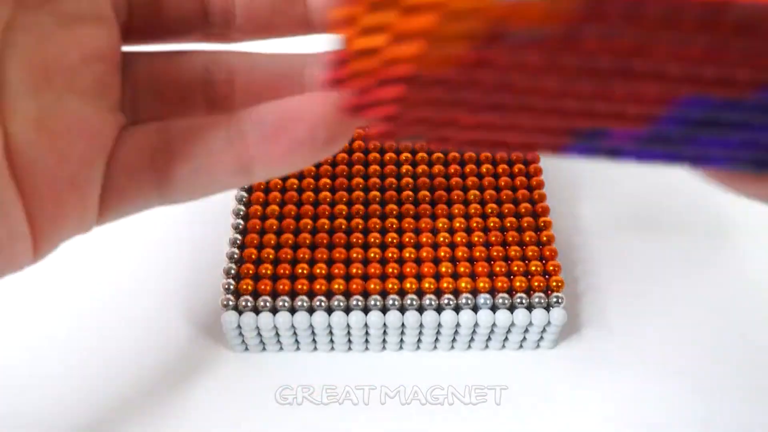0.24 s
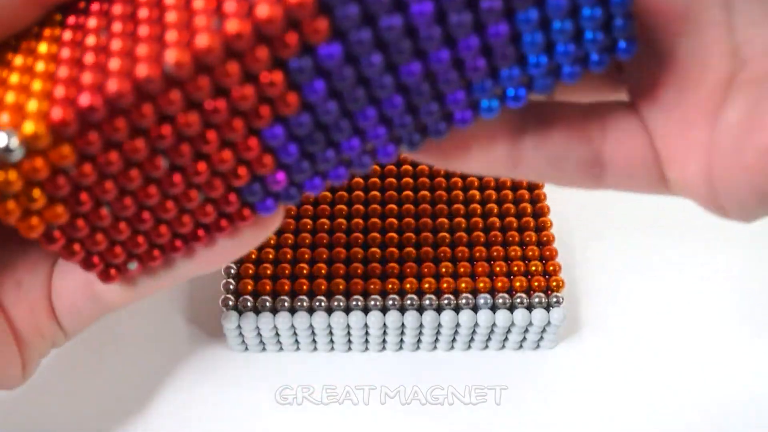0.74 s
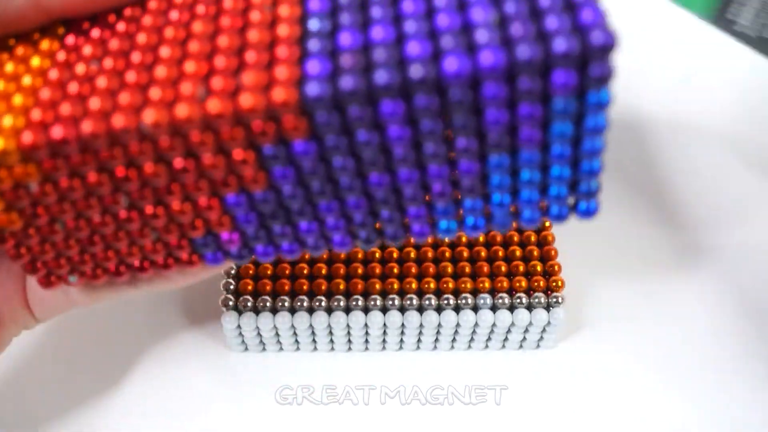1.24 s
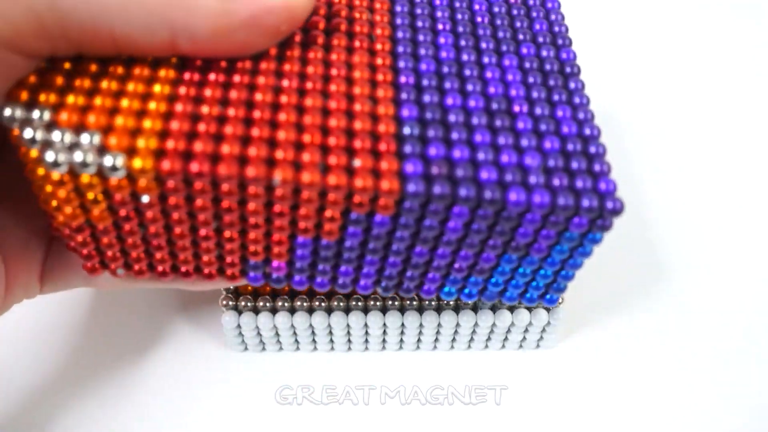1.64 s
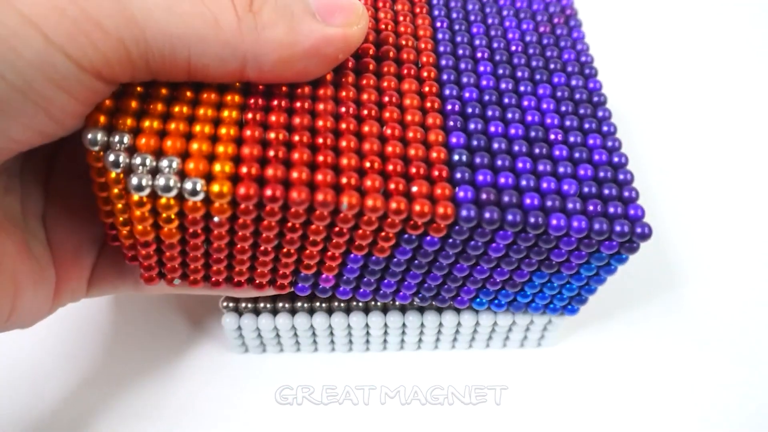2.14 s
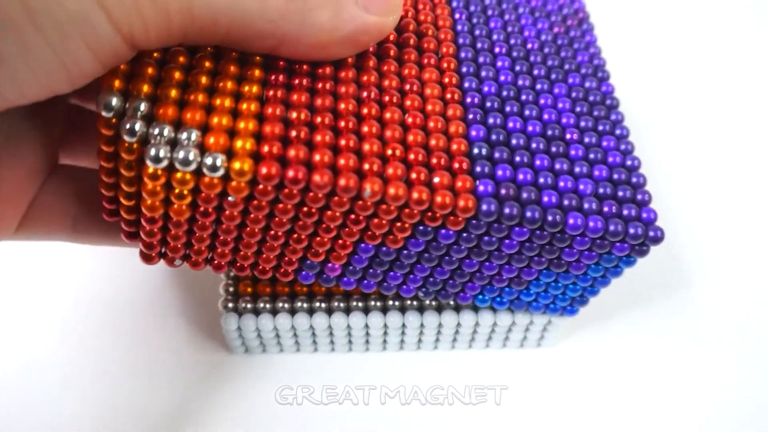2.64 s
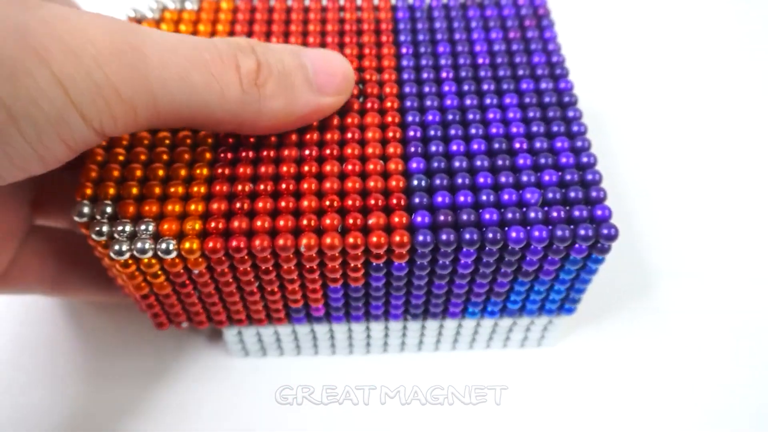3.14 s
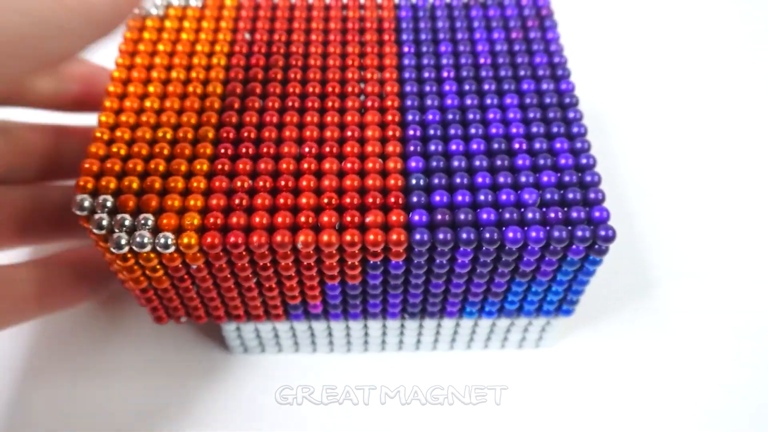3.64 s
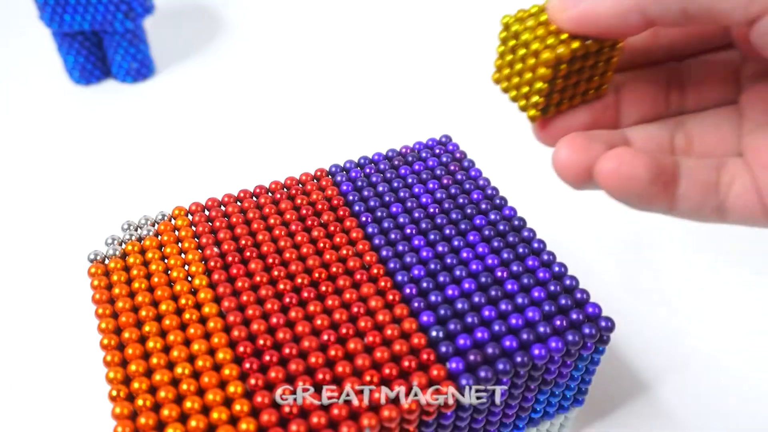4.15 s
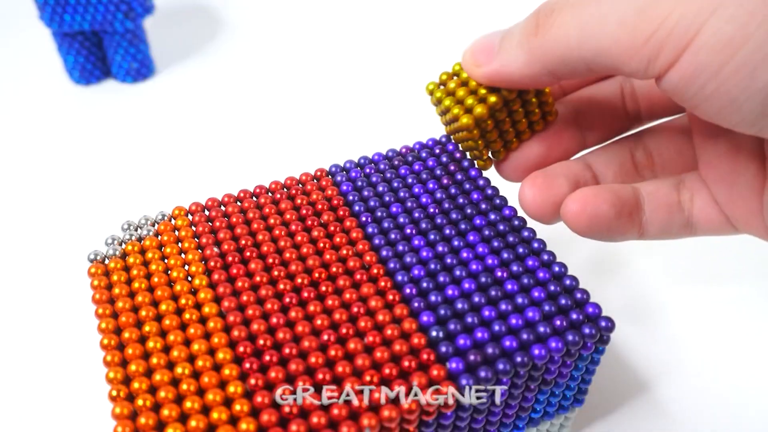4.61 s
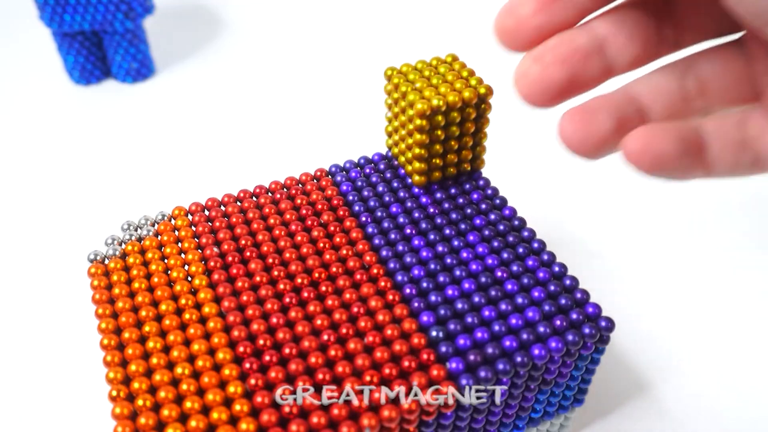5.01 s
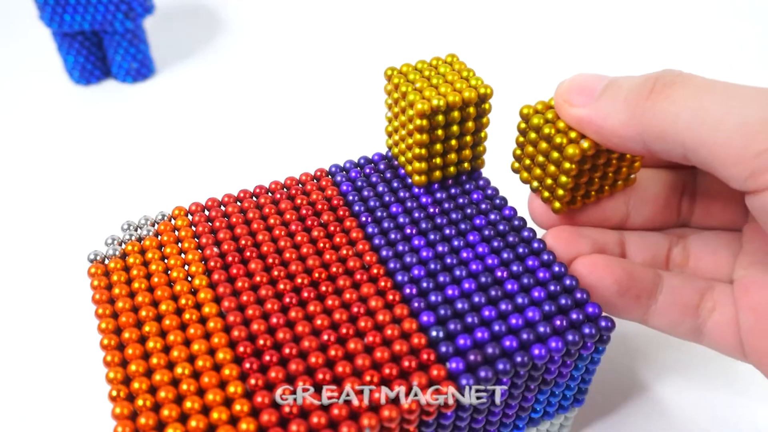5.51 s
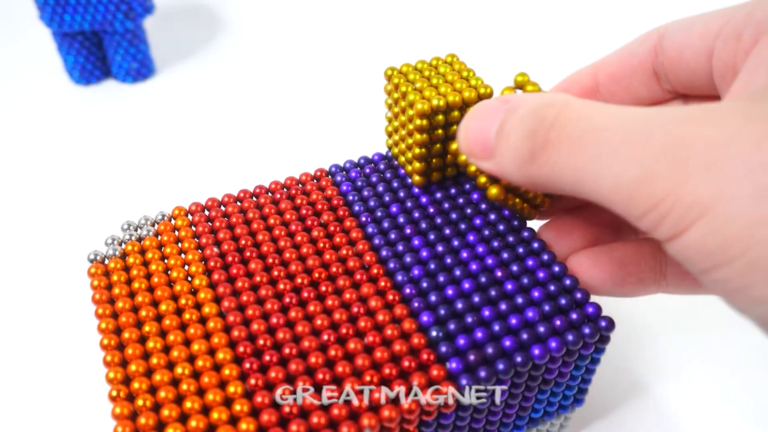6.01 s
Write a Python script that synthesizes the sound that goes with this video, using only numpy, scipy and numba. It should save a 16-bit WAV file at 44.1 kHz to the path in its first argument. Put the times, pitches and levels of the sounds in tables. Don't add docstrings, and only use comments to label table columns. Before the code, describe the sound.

Close metallic bead rattles and bright clicks give way to three heavy, woody table thumps and lighter cube snaps over soft hiss.

```python
import sys
import numpy as np
from scipy import signal
from scipy.fft import rfft, irfft
from scipy.io import wavfile
from numba import njit

SR = 44100
rng = np.random.default_rng(int(sys.argv[2]) if len(sys.argv) > 2 else 0)


def how_loud(loudness_db):
    steps = np.asarray(loudness_db, float) / 20
    return 10 ** steps


def wav_out(sig):
    wavfile.write(sys.argv[1], SR, np.round(np.clip(np.atleast_2d(sig).T, -1, 1) * 32767).astype(np.int16))


N = 276504
T = np.arange(N) / SR

# start in seconds, peak in dB, contact in ms, place struck (rounded to an index).
BLOWS = [(1.26, -25, 0.63, 1.5), (1.279, -31, 2.5, -0.5), (1.601, -28, 1.6, 2), (2.1148, -10, 1.4, 0),
         (2.116, -29, 4, 3), (2.158, -20.5, 2, 0), (2.192, -34.5, 13, 2.5), (2.74, -42, 2.5, 1),
         (2.799, -35, 2.5, 1), (2.98, -39.5, 2.1, 1), (3.156, -37, 2.6, 1.5), (3.19, -26, 0.98, 2),
         (3.2153, -6.5, 0.58, 1), (3.258, -24, 2.2, 1.5), (3.712, -35, 0.83, 4), (4.598, -28, 0.59, 4),
         (5.0088, -5, 1.4, 2.5), (5.05, -19, 1.9, 2.5), (5.101, -38, 7.6, 3.5), (5.85, -27.5, 0.76, 4)]
EDGES_HZ = (520, 2600, 6500, 10500, 16200)
RATTLE_COLOUR_DB, SKIN_COLOUR_DB = (-2, -9.5, -19), (0, -3, -1)


def unit(x):
    return x / np.sqrt(np.mean(x ** 2))


def band(x, lo_hz, hi_hz):
    return signal.sosfilt(signal.butter(2, (lo_hz, hi_hz), "band", fs=SR, output="sos"), x)


def spread(x, pan_db):
    return x * how_loud(np.array([pan_db, -pan_db]) / 2)


def floor():
    # frequency in Hz, hiss density in dB per Hz.
    hiss_curve = [(12, -53), (20, -34), (48, -10.5), (71, -2), (86, -17.5), (124, -3), (143, -10),
                  (492, -16), (535, -16), (863, -19.5), (10500, -31.5), (14700, -33), (16500, -48)]
    # frequency in Hz, likeness of left and right, where 1 is the same and 0 or less is unrelated.
    likeness = [(60, 0.97), (130, 0.85), (290, 0.36), (640, -0.16), (1410, -0.35), (3100, 0), (6820, 0.15),
                (15000, 0.33)]
    # time in seconds, hum level in dB.
    hum_course = [(0.0, -68), (0.2, -56), (2.0, -58), (3.5, -57), (4.0, -57), (4.3, -66), (4.7, -55),
                  (5.5, -62.5), (6.27, -58)]
    hiss_db, rumble_db, hum_hz = -51.5, -62.5, 120
    shake_db, shake_t60_s = -32.5, 0.52

    log_hz = np.log(np.maximum(np.arange(N // 2 + 1) * SR / N, 1))

    def read(curve):
        hz, value = np.transpose(curve)
        return np.interp(log_hz, np.log(hz), value)

    like = np.clip(read(likeness), 0, 1)
    mid, side = (rfft(rng.standard_normal(N)) * how_loud(read(hiss_curve)) for _ in range(2))
    pair = mid * np.sqrt(1 + like) + side * np.sqrt(1 - like) * np.array([[1], [-1]])
    hiss = unit(irfft(pair, N)) * how_loud(hiss_db)

    hum = how_loud(np.interp(T, *np.transpose(hum_course))) * np.sqrt(2) * np.sin(2 * np.pi * hum_hz * T)

    start, peak_db = np.array(BLOWS).T[:2, :, None]
    since = T[::64] - start
    shakes = how_loud(peak_db + shake_db - 60 * np.abs(since) / shake_t60_s) * (since > 0)
    shake = shakes.sum(0).repeat(64)[:N]
    rumble = (how_loud(rumble_db) + shake) * unit(band(rng.standard_normal(N), 44.3, 88.7))
    return hiss + hum + rumble


def hands(t):
    # time in seconds, left minus right in dB, hollow between block and palm in Hz.
    places = [(0.0, 5, 1460), (0.39, -1, 1710), (0.58, 1, 1970), (0.86, -0.5, 2270), (0.94, -0.2, 1540),
              (1.11, -1, 1270), (1.18, -1.5, 1610), (1.24, -2, 820), (1.3, -3, 1270), (1.6, -3.5, 1850),
              (2.12, -2, 1250), (2.5, 4, 2000), (3.2, 0.8, 1400), (3.72, 3, 1800), (3.97, -6, 1930),
              (4.6, -1.5, 1810), (5.01, 2, 1000), (5.85, -1.5, 1530)]
    s, pan_db, gap_hz = np.transpose(places)
    return np.interp(t, s, pan_db), np.interp(t, s, gap_hz)


@njit
def hollow(x, hz, width):
    y, b, l = np.empty(len(x)), 0., 0.
    for i in range(len(x)):
        g, k = np.tan(np.pi * hz[i] / SR), width
        v = (b + g * (x[i] - l)) / (1 + g * (g + k))
        b, l, y[i] = 2 * v - b, l + 2 * g * v, k * v
    return y


def ranges(draw, ringing, gap_hz):
    # centre in Hz, width in Hz, level in dB.
    resonances = [(834, 285, 2.5), (1325, 250, 4.5), (2000, 420, 4), (2640, 460, 1.5), (3400, 500, 1),
                  (4187, 310, 2.5), (5680, 1360, 7)]
    rung = sum(how_loud(db) * unit(band(draw(), hz - w / 2, hz + w / 2)) for hz, w, db in resonances)
    low = ringing * unit(rung) + (1 - ringing) * unit(band(draw(), 480, 8100))

    def gap(hz):
        return unit(hollow(hollow(draw(), hz, .4), hz, .4))

    body = low + (.25 + .8 * ringing) * gap(gap_hz)
    ring = low + .7 * ringing * gap(2.3 * gap_hz)
    sources = (body, ring, draw(), draw())
    signs = (1, -1, 1, 1)
    return [sign * unit(band(x, lo, hi)) for sign, x, lo, hi in zip(signs, sources, EDGES_HZ, EDGES_HZ[1:])]


def strokes(rows, colour_db, roundness):
    lift_share = (0, 0.74, 1.16, 1.36)
    treble_fall = (1, 0.86, 0.84, 0.73)
    s, db, rise, fall, bright_db = np.array(rows).T[:, :, None]
    t = T[::32]
    gains = []
    for lift_db, share, sooner in zip((0, *colour_db), lift_share, treble_fall):
        before = (s - t) / np.maximum(rise, .002)
        after = (t - s) / np.maximum(fall * sooner, .002)
        away = np.where(t < s, before, after)
        level = how_loud(db + lift_db + share * bright_db - 20 * away ** roundness)
        gains.append(np.interp(T, t, np.sqrt(np.sum(level ** 2, 0))))
    return gains


def contacts(gains, until_s, per_s, ringing, scatter_db, width):
    n = min(int(until_s * SR), N)
    gains = [g[:n] for g in gains]
    pan_db, gap_hz = hands(T[:n])
    train = (rng.random(n) < per_s / SR) * rng.uniform(-1.22, 1, n)
    train = train * how_loud(scatter_db * np.minimum(rng.exponential(size=n), 3))
    parts = ranges(lambda: np.roll(train, rng.integers(n)), ringing, gap_hz)
    mid = sum(g * p for g, p in zip(gains, parts))
    side = sum(g * share * np.roll(p, n // 3) for g, share, p in zip(gains[1:], (.7, 1, 1.1), parts[1:]))
    pair = mid + width * side * np.array([[1], [-1]])
    return np.pad(spread(pair, pan_db), ((0, 0), (0, N - n)))


def rattles():
    # peak in seconds, body in dB, rise in s and fall in s (both over 20 dB), brightness in dB.
    shears = [(0.018, -50, .012, 0.048, -5), (0.408, -40, 0.011, .035, 12), (0.48, -58.5, 0.071, .12, 7),
              (0.56, -49.5, 0.054, 0.035, 6.5), (0.592, -29, 0.022, 0.092, 0),
              (0.664, -21, 0.034, 0.039, -0.5), (0.72, -46.5, .03, 0.069, -2),
              (0.790, -31, 0.035, 0.046, 0), (0.862, -25.5, 0.054, 0.053, 2), (0.946, -18, 0.036, 0.041, 6),
              (0.968, -20, 0.037, 0.031, -7), (1.0, -48, .02, 0.091, 1), (1.118, -31, .012, 0.06, -13),
              (1.154, -14.5, 0.032, 0.054, 3.5), (1.195, -21, 0.024, 0.032, 4),
              (1.235, -24.5, 0.032, 0.057, -7), (1.275, -29.5, .05, 0.035, 4), (1.31, -50, .02, .08, 9)]
    gains = strokes(shears, RATTLE_COLOUR_DB, roundness=1.29)
    return contacts(gains, until_s=1.6, per_s=2200, ringing=.7, scatter_db=3.2, width=0.45)


def clicks():
    # start in seconds, ring peak in dB, body and
    # air in dB relative to the ring.
    lone_contacts = [(0.397, -21.5, -10, -12), (0.4055, -21, -25, -16), (0.463, -36.5, 2, -27),
                     (0.51, -41, -4, -21), (0.5837, -27, -18, -24), (0.7716, -25, -2, -29),
                     (0.9388, -12, -8.5, -15), (0.9859, -13, -17, -13), (1.2196, -14, -1, -12),
                     (1.2416, -21, 0, -5), (1.2468, -13, -14, -8), (1.2593, -13, 3, -6), (1.270, -15, -9, -6),
                     (1.281, -10.5, -5, -6), (1.29, -14, -9, -10),
                     (1.702, -24.5, 5, -31), (2.113, -19, -6.5, 1), (2.9825, -49, 9.5, -16),
               (3.1768, -33, 4.5, 3.5), (3.1929, -34, 12, 2), (3.2, -21.5, -11, 2), (3.2172, -24.5, -6, -6),
               (3.259, -32, -16, -18), (3.687, -44, -12, -5), (3.7083, -17, -14, -16),
               (3.749, -41, -10, -6), (4.0661, -40, 0, -12), (4.5956, -20, -12, 1.5), (4.598, -23, -6, 5),
               (5.009, -17, 2, 4.5), (5.8478, -19.5, -18, 7), (5.8522, -21, -14, 4), (6.2679, -24, -36, 3)]
    fizz_of_air = .55
    click_pan = 2.6

    out, t = np.zeros((2, N + 1000)), T[:1000]
    s, ring_db, body_db, air_db = np.array(lone_contacts).T[:, :, None]
    bursts = rng.standard_normal((len(s), 1000)) * np.exp(-t / 0.0019) * np.clip(t / 0.0001, 0, 1)
    bursts[:, 8] += 3.5
    peaks_db = ring_db + body_db, ring_db, ring_db + fizz_of_air * air_db, ring_db + air_db
    snaps = 0
    for sign, db, lo, hi in zip((1, -1, 1, -1), peaks_db, EDGES_HZ, EDGES_HZ[1:]):
        part = band(bursts, lo, hi)
        snaps = snaps + sign * how_loud(db) * part / np.abs(part).max(1, keepdims=True)
    starts = (s[:, 0] * SR).astype(int)
    for start, snap, pan_db in zip(starts, snaps, click_pan * hands(s)[0]):
        out[:, start:start + 1000] += spread(snap, pan_db)
    return out[:, :N]


def thumps():
    # frequency in Hz, level in dB, t60 in seconds.
    modes = [
        [(127.5, -3, 0.74), (218, 12, 0.084), (319, 1.5, 0.2), (510, -16, 0.41), (590, -9, 0.17),
         (880, 20, 0.078), (1071, -20, 0.18), (1330, -20, 0.37)],
        [(177.7, 1.5, 0.22), (256, -5, 0.21), (340, -18, 0.26), (420, -22, 0.33), (536, -20.5, 0.46),
         (628, -25, 0.15), (942, -35, 0.24), (1389, -35, 0.36)],
        [(170, -10.5, 0.28), (306.7, -4, 0.14), [243.7, 0, 0.13], [491, -26, 0.24], [649, 0, 0.076],
         [770, 2.5, 0.13], [887, 6.5, 0.18], [1070, -9, 0.63], [1328, 7.5, 0.24], [1400, 6, 0.31]],
        [(78, 0.1, 0.69)],
        [(220, -4, 0.18), (642, 2.1, 0.11), (1200, -1, 0.19)],
    ]
    out, t = np.zeros(N + SR), T[:SR // 5]
    for s, db, ms, place in BLOWS:
        hz, g, t60 = np.array(modes[int(round(place))]).T[:, :, None, None]
        cluster = hz * (1 + 0.0639 * rng.standard_normal((len(hz), 7, 1)))
        sign = (-1) ** np.arange(len(hz))[:, None, None]
        swing = sign * (1 - np.exp(-t * hz / 0.28))
        decay = np.exp(-t * np.log(1000) / (0.74 * t60))
        ring = (swing * how_loud(g) * np.sin(2 * np.pi * cluster * t) * decay).sum((0, 1))
        push = np.sin(np.pi * np.clip(t[:400] * 1000 / max(ms, .1), 0, 1))
        blow = band(np.convolve(ring, push)[:len(t)], 75, 3100)
        start = int(s * SR)
        out[start:start + len(t)] += how_loud(db) * blow / np.abs(blow).max()
    return out[:N]


def rubs():
    # peak in seconds, body in dB, rise in s, fall in s, brightness in dB.
    slides = [
        (1.492, -44, .008, .05, 1),
        (1.525, -40, .045, .1, 6),
        (1.595, -34, .1, .09, -1),
        (2.485, -59.5, 0.053, 0.083, 5.5),
        (3.212, -35.5, 0.036, 0.04, -3),
        (3.945, -56, .02, .05, 5),
        (3.99, -45, 0.039, .08, 0.5),
        (4.062, -46, .1, 0.013, 3),
    ]
    # peak in seconds, body in dB, fall in s, brightness in dB.
    settling = [
        (1.705, -44, .1, -7),
        (2.117, -35, .06, -10),
        (3.222, -43, 0.11, -4),
        (3.711, -50, .04, 3),
        (4.6, -42.5, 0.097, 4.5),
        (5.013, -29, .08, -28),
        (5.853, -45.5, 0.083, 9.5),
    ]
    # peak in seconds, body in dB, rise in s, fall in s, brightness in dB.
    creeps = [
        (3.692, -58, .006, .04, 10),
        (3.715, -46, .01, .06, 9),
        (3.748, -45, .04, .035, 9),
        (3.78, -58, .03, .06, 8),
    ]
    settle_rise_s = .003
    settles = [(s, db, settle_rise_s, fall, bright_db) for s, db, fall, bright_db in settling]
    gains = np.hypot(strokes(slides, SKIN_COLOUR_DB, roundness=1.54),
                     strokes(settles, SKIN_COLOUR_DB, roundness=0.87))
    gains = np.hypot(gains, strokes(creeps, RATTLE_COLOUR_DB, roundness=1.5))
    return contacts(gains, until_s=7, per_s=9000, ringing=.3, scatter_db=1.5, width=1.0)


def room(x):
    # band centre in Hz, t60 in seconds, level in dB.
    washes = [(90.85, 0.28, -3), (204, 0.57, -9), (570, 0.2, 0.5), (1850, 0.19, -9), (6070, 0.066, -10.5),
              (11800, 0.22, -14)]
    t, tail = T[:SR // 2], 0
    for hz, t60, db in washes:
        noise = rng.standard_normal((3, len(t)))
        pair = noise[0] + min(hz / 3000, 1) * noise[1] * np.array([[1], [-1]])
        wash = band(pair, hz / 1.98, min(hz * 1.28, 17000)) * 1000 ** (-t / t60) * np.clip(t / 0.00053, 0, 1)
        tail = tail + how_loud(db) * wash / np.sqrt(np.sum(noise[2] ** 2 * 1000 ** (-2 * t / t60)))
    return signal.fftconvolve(x.mean(0)[None], tail, axes=1)[:, :N]


def scene():
    near = rattles() + clicks() + thumps() + rubs()
    return near + room(near) + floor()


def top_cut(x):
    return signal.sosfilt(signal.butter(12, 17020, fs=SR, output="sos"), x)


def record(dry):
    rounded = .9 * np.tanh(dry / .9)
    mix = signal.sosfilt(signal.ellip(8, .2, 60, 15900, fs=SR, output="sos"), rounded)
    return top_cut(mix)


dry = scene()
out = record(dry)
wav_out(out)
```